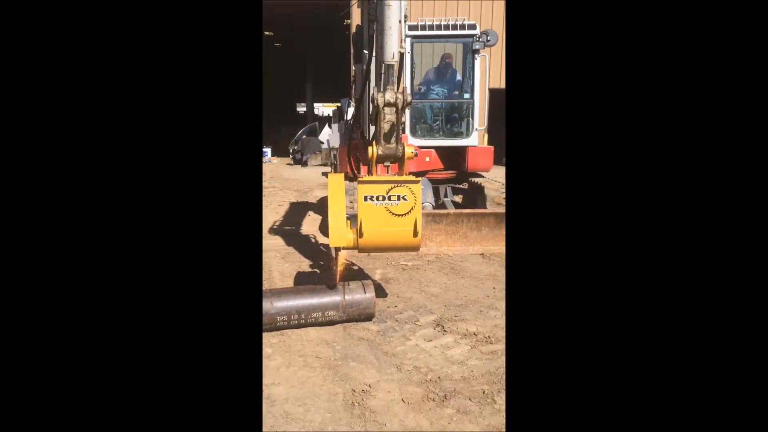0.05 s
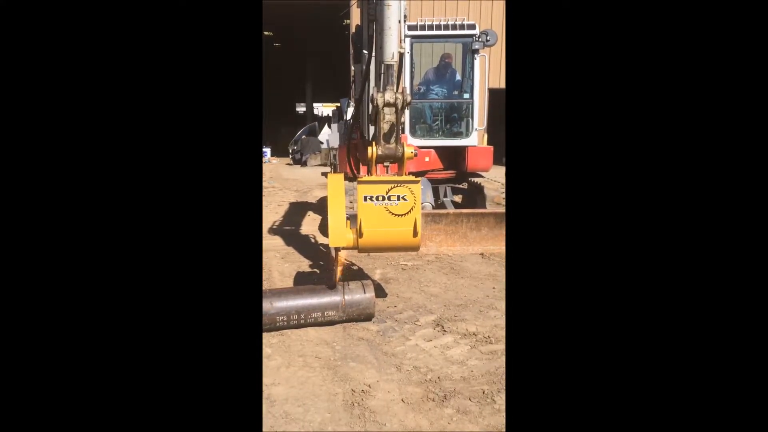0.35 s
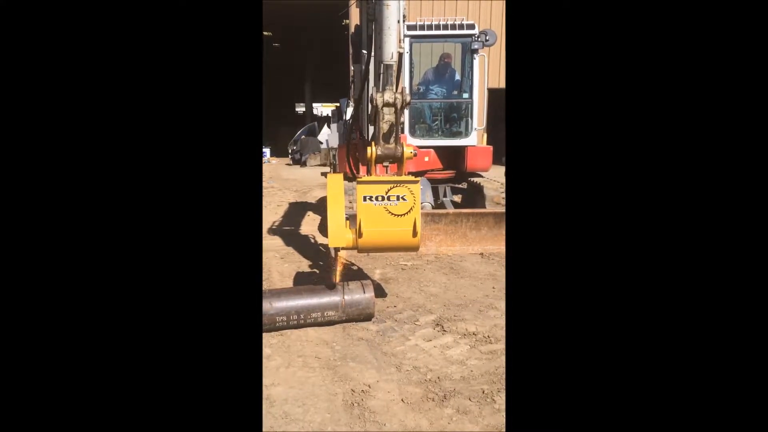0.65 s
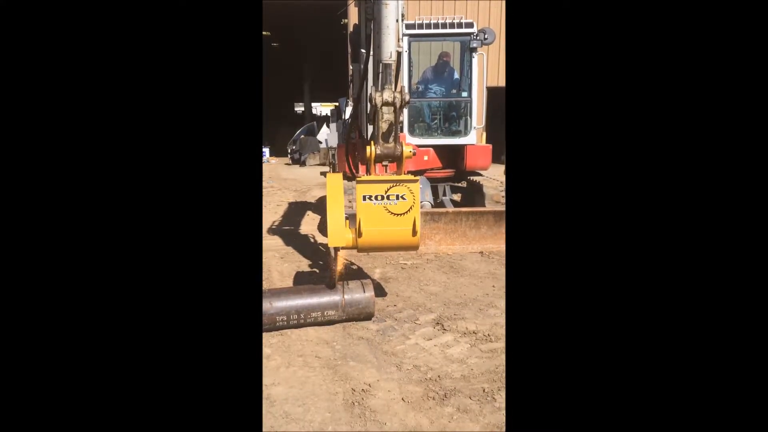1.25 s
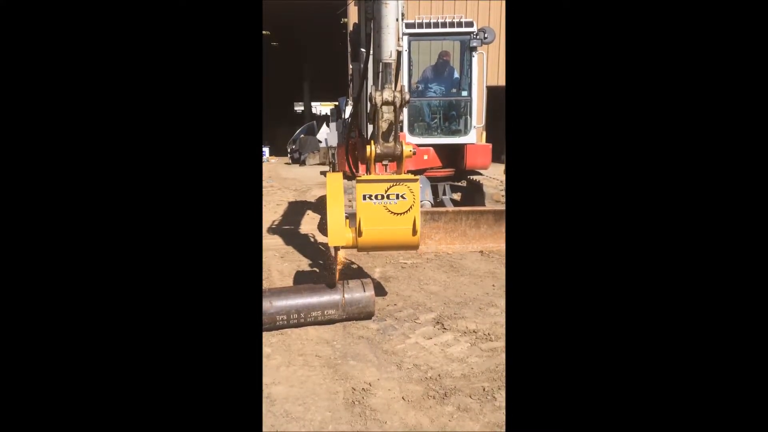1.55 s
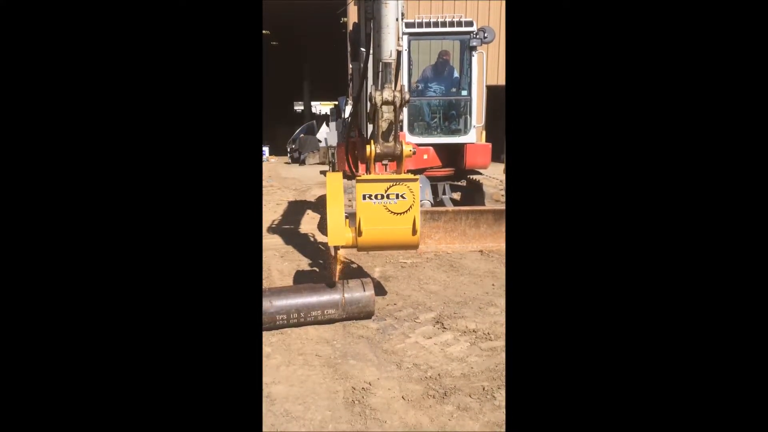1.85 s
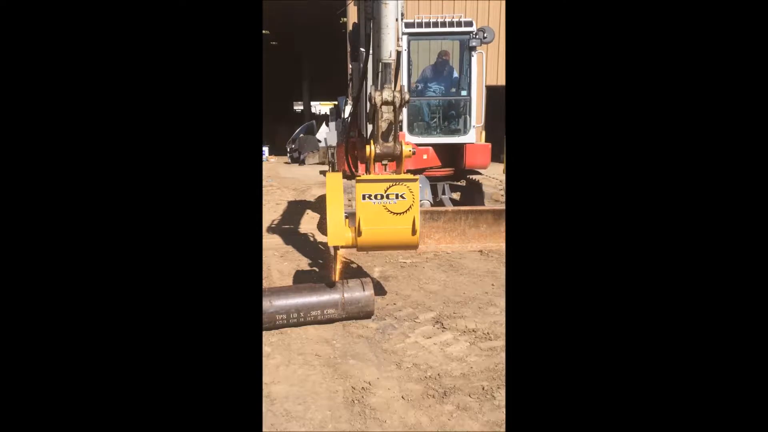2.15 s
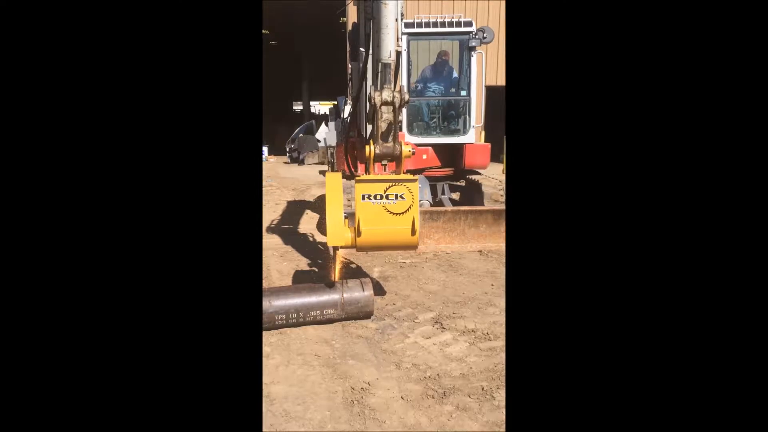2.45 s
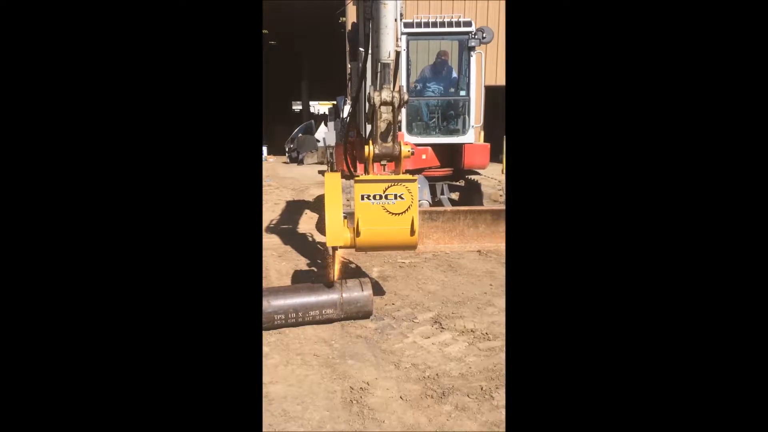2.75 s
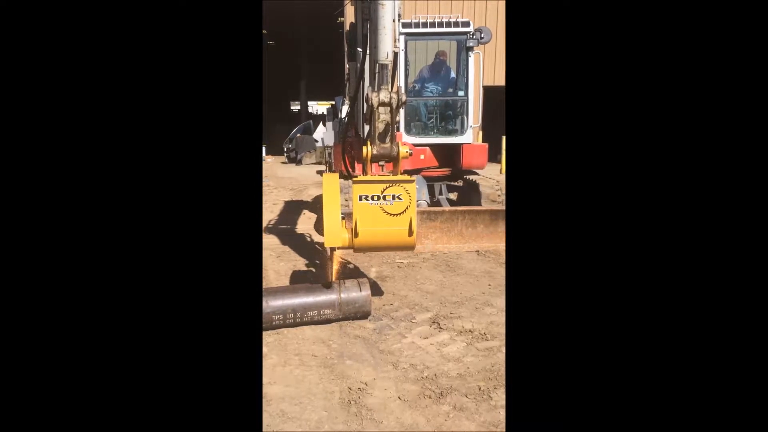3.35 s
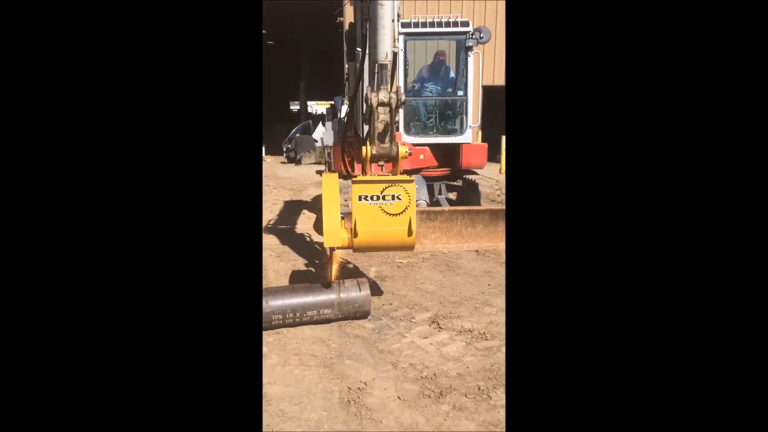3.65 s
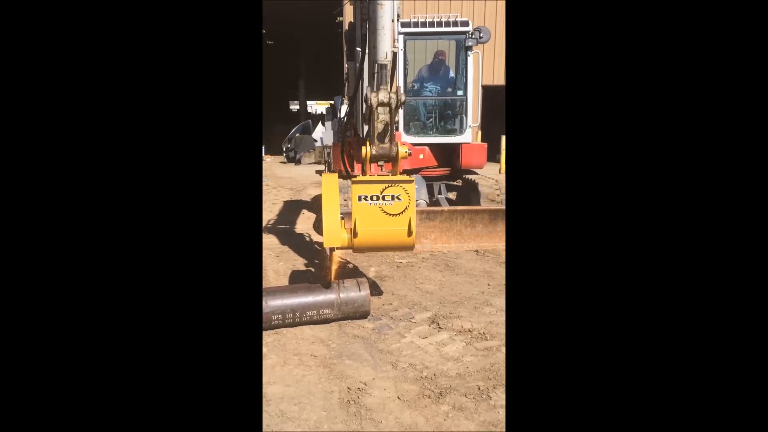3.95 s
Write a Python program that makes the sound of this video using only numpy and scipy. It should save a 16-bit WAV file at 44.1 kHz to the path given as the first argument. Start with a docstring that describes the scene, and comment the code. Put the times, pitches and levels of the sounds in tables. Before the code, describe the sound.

Saw blade cutting a steel pipe with a harsh ringing screech, diesel engine droning underneath.

```python
"""Circular saw on a steel pipe

An open yard, one microphone, close and dry, facing an excavator that holds a saw against a pipe.
The rim grinds past the cut about 37 times a second, nearly alike on every turn, and rings blade
and pipe. As it bites deeper the blade slows, the low ring fades and the screech grows.
The diesel drones steadily below."""
import sys
import numpy as np
from scipy import signal
from scipy.fft import rfft, irfft
from scipy.io import wavfile
from scipy.ndimage import uniform_filter1d, map_coordinates

SR = 44100
rng = np.random.default_rng(int(sys.argv[2]) if len(sys.argv) > 2 else 0)


def master(y):
    """Save y as 16-bit WAV."""
    cut = np.clip(np.atleast_2d(y).T, -1, 1)
    pcm = np.round(cut * 32767)  # scale
    wavfile.write(sys.argv[1], SR, pcm.astype(np.int16))


N = 176400
TIME = np.arange(N) / SR
HZ = np.maximum(np.arange(N // 2 + 1) * SR / N, 1)

# Blade speed. Each row: time in seconds, turns per second.
BLADE_SPEED = [(0.0, 36.55), (0.07, 36.66), (0.25, 37.31), (0.4, 37.57), (0.52, 37.6), (0.8, 37.3),
               (1.03, 37.39), (1.25, 37.3), (1.45, 37.36), (1.85, 37.31), (2.15, 37.03), (2.35, 36.98),
               (2.55, 36.86), (2.95, 36.68), (3.35, 36.36), (3.55, 36.13), (4.0, 35.68)]
# How far the rim has sunk into the pipe wall. Each row: time in seconds, depth from 0 to 1.
CUT_DEPTH = [(2.2, 0), (2.9, 1)]
# Sparks and chips, new on every turn. Each row: frequency in Hz, dB against the repeating grind.
SPARK_SPECTRUM = [(250, -1), (550, -0.5), (900, -4.5), (1800, -5), (3800, -5.5), (6000, -6), (8500, -6.5),
                  (13000, -3)]
# More sparks as the blade bites deeper. Each row: time in seconds, added level in dB.
SPARK_RISE = [(2.3, -2), (3.3, 0.5), (3.8, 1)]
# The steel's shimmer. Each row: frequency in Hz, shifting part in dB against the steady part.
SHIMMER_SHARE = [(600, -20), (1200, -11), (2200, -8), (4000, -7), (6000, 0), (12000, 6)]
# Broad colour of the cut. Each row: frequency in Hz, gain in dB.
CUT_COLOUR = [(240, -14.5), (310, -23.5), (380, -29), (470, -15), (700, -17), (900, -9.5), (1150, -15.5),
              (1500, -11), (1950, -8), (2150, -3.5), (2550, -9), (3200, -6.5), (3900, -6.5), (4700, -8.5),
              (6200, -10), (8000, -14.5), (10000, -20), (11000, -28.5), (13000, -28.5), (13900, -25.5),
              (15000, -38)]
# Passing resonances and notches of blade and pipe.
# Each row: fade-in and fade-out times in seconds, centre and width in Hz, lift in dB.
STEEL_RESONANCES = [(1, 2.23, 261.5, 7.7, 8), (4, 3.8, 1085, 15, 6), (2.1, 2.9, 1220, 54, -7),
                    (2.6, 3.2, 1650, 120, -2), (0, 2.4, 1790, 46, 1), (3, 3.8, 2110, 55, 4),
                    (2.3, 3.06, 4260, 70, 4), (3.2, 3.6, 2900, 87, 6), (0, 2.1, 3685, 38, -10),
                    (2.6, 3.4, 2400, 40, -5), (1, 3.4, 1920, 35, -9), (3.5, 4.6, 3940, 180, 2.5),
                    (0, 0.7, 3880, 40, 5), (1, 2.16, 4750, 90, -5), (2, 1, 5960, 60, 5),
                    (0.5, 1.8, 6950, 160, 3.5)]
# The cut's six registers at the microphone, low to high. Each row: time in seconds, level in dB.
GROWL = [(0.0, -53.5), (0.2, -55.5), (1, -54.5), (2.3, -54), (3.3, -55.5), (4, -55)]
RING = [(0.0, -47.5), (0.3, -48), (1.2, -52), (2.2, -53), (3, -53), (4.0, -51)]
RASP = [(0.0, -53), (0.26, -51), (0.53, -54), (0.7, -48), (2, -48.5), (2.6, -50), (3.04, -51.5),
        (3.55, -49.5), (4.0, -49)]
SNARL = [(0.0, -41.5), (0.29, -42.5), (0.5, -44), (1.5, -43.5), (2.3, -44), (2.94, -44), (3.4, -43),
         (3.78, -42), (4.0, -43)]
SCREECH = [(0.0, -44), (0.27, -40), (0.5, -43), (1.05, -44), (1.9, -44.5), (2.25, -40.5), (2.87, -42.5),
           (3.1, -44.5), (3.5, -41.5), (3.8, -37.5), (4.0, -38)]
HISS = [(0.0, -41), (0.23, -40.5), (1.74, -41), (2.6, -40.5), (3.2, -40.5), (4.0, -39.5)]
# The rim's high spot swells each register once a turn. Each row: level curve, low and high edge in Hz,
# place of the swell in turns for a shallow and a deep cut, its width in turns, its height in dB for
# a shallow and a deep cut, the overtones' phase scatter and dispersion in radians.
REGISTERS = [(GROWL, 242, 790, .35, 0.35, 0.34, 0.42, .5, 2, 0),
             (RING, 810, 1416, 0.42, 0.31, 0.55, 1, 1.5, 0.29, 1.4),
             (RASP, 1431, 1902, 0.27, 0.99, 0.1, 9.3, 3, 0.65, 0),
             (SNARL, 1980, 3440, 0.5, 0.51, 0.13, 2.7, 7, 0.34, 0),
             (SCREECH, 3388, 4593, 0.14, 0.2, 0.053, 5.3, 2, .6, 0),
             (HISS, 4607, 23000, 0.22, 0.24, 0.053, 4.4, 2.8, 0.95, 0)]
# Blade overtones that meet a resonance of the steel and sing for a spell. Each row: multiple of the
# blade speed (rounded in use), the spell's two ends in seconds (either order), level in dB.
BLADE_OVERTONES = [(13, 3, 4.3, -61.5), (14, -0.1, 1.1, -60.5), (15, -0.25, 0.2, -52), (15, .22, 4.3, -62),
                   (16, 0.35, 2.23, -57.5), (16, 3.5, 4.3, -59), (19, 2.5, 3.45, -57.5), (21, 1, 3.1, -59),
                   (23, 0.4, 2.2, -55), (24, -1.1, 2.96, -50.5), (25, -0.25, 0.27, -43.5),
                   (25, 0.7, 2.1, -51.5), (25, 2, 3.14, -47), (25, 3.5, 3.63, -49), (26, 0.6, 3.6, -52),
                   (27, 0.8, 2.9, -58), (28, 0.1, 2.56, -54.5), (29, 2.5, 3.44, -56.5),
                   (30, 3, 3.84, -58.5), (33, 0.8, 1.9, -54.5), (35, 3, 5.2, -55), (37, 2, 1.9, -64),
                   (38, 2, 3.46, -57), (40, -0.7, 2.75, -54), (41, -0.2, 2.6, -53.5), (42, 3, 3.86, -56),
                   (44, 2.8, 3.8, -57), (47, 0.1, 2.5, -48.5), (48, -0.26, 0.34, -46.5), (48, 0, 1.35, -54),
                   (49, -0.14, 0.33, -47), (49, 0.2, 2.1, -47.5), (49, 2.5, 3.3, -56.5),
                   (49, 3.37, 3.53, -42.5), (49, 3.6, 4.3, -52.5), (55, .2, 2.15, -52),
                   (56, 1.14, 3.5, -49), (57, -.3, 2.45, -52), (57, 2.5, 3.82, -48.5),
                   (58, 2.5, 5.2, -51.5), (59, 3, 5.2, -58), (60, 2.8, 4.8, -52), (61, 2.5, 2.2, -51),
                   (62.91, -0.3, 2.4, -54), (64, -0.5, 2.96, -52.5), (64.98, 3, 4.3, -53),
                   (66.6, 3, 4.3, -56), (71.8, 0.9, 1.65, -51.5), (76.1, -0.3, 0.76, -52),
                   (78.92, 2.5, 2.7, -50.5), (79.87, 0.5, 4.3, -50.5), (85, 4, 2.6, -50.5),
                   (85, 3.5, 4.3, -47.5), (87.2, 0.9, 2.2, -51), (90.85, 0, 1, -53),
                   (91.94, -0.2, 1.7, -51.5), (94.1, 3, 3.5, -53.5), (96.05, 2, 3.1, -52),
                   (97.1, 2, 4.7, -50.5), (101.9, 0.4, 2.1, -49.5), (103, -0.3, 2.09, -51),
                   (103.3, 2, 3.1, -44.5), (104.1, .7, 2, -51.5), (106, 3, 5, -49), (110, 3.5, 5.7, -47),
                   (113.9, 2.3, 3.6, -50.5), (115, 0.8, 3.2, -52.5), (116.2, 0.7, 1.77, -49),
                   (116.25, 2.5, 3.9, -49.5), (133.6, 7, 3.9, -51), (138.3, -1, 1.3, -56),
                   (141.4, -1.2, 3, -58), (159, 0.7, 0.94, -55), (159.3, 0.7, 2.2, -55.5),
                   (161.4, -1.5, 2.7, -55), (173.3, 3, 3.4, -61.5), (187.6, .2, 1.5, -58)]
# Exhaust tones. Each row: multiple of the firing rate, level in dB.
EXHAUST_TONES = [(1, -42.5), (2, -57.5), (3, -68)]
# Other steady hums of the machine. Each row: frequency in Hz, level in dB.
MACHINE_HUMS = [(43.7, -57), (112, -54.5), (351.9, -76)]
# Engine rumble. Each row: frequency in Hz, relative level in dB.
RUMBLE_SPECTRUM = [(20, -17), (40, -9), (65, -1), (100, 2), (150, 1), (190, -0.5), (240, -3.5), (300, -32),
                   (400, -14), (800, -20.5)]

WEAR_RAD, WEAR_RAD_PER_KHZ = 0.047, 0.044   # shift of the rim's ripples from turn to turn
SUNG_RIPPLE_DB, RIPPLE_SPREAD_DB = -11, 1.8
SHIMMER_S, SHIMMER_HZ = 0.14, 28   # life and width of a patch
RESONANCE_FADE_S, OVERTONE_FADE_S = 0.064, 0.1
OVERTONE_WAVER_DB, OVERTONE_WAVER_HZ = 1, 4.7
SLIP_RAD_PER_KHZ, SLIP_HZ = 0.096, 7.1   # the blade runs unevenly and pulls all overtones along
FLUTTER_DB, FLUTTER_HZ = 0.5, 8.9   # uneven feed: each register wavers a little
DIP_AT_S, DIP_WIDTH_S, DIP_DB = 3.714, 0.007, -20
FIRING_HZ, RUMBLE_DB = 77.63, -48
ENGINE_WAVER_DB, ENGINE_WAVER_RAD = 1, 0.07
CUTOFF_HZ = 15300


def from_db(db):
    """Decibels to gain."""
    return 10 ** (np.asarray(db) / 20)


def rms_one(x):
    """Scale to unit rms."""
    return x / np.sqrt(np.mean(x ** 2) + 1e-20)


def in_time(rows):
    """A curve's value at every sample."""
    return np.interp(TIME, *np.transpose(rows))


def over_hz(points):
    """A spectrum's value at every frequency."""
    hz, db = np.transpose(points)
    return np.interp(np.log(HZ), np.log(hz), db)


def coloured(x, gain):
    """Filter by a gain per frequency."""
    return irfft(rfft(x) * gain, N)


def band(x, low_hz, high_hz, steepness):
    """Keep what lies between two frequencies."""
    return coloured(x, 1 / ((1 + (low_hz / HZ) ** steepness) * (1 + (HZ / high_hz) ** steepness)))


def evened(x, size=4760):
    """Hold the level at 1 over a few turns."""
    return x / np.sqrt(uniform_filter1d(uniform_filter1d(x * x, size), size) + 1e-20)


def drift(rate_hz):
    """A slow random wander with spread 1."""
    return rms_one(coloured(rng.standard_normal(N), 1 / (1 + (HZ / rate_hz) ** 2)))


def coarse_drift(rate_hz, size=800):
    """The same kind of wander, drawn on a coarse grid."""
    hz = np.arange(size // 2 + 1) * SR / N
    slow = rms_one(irfft(rfft(rng.standard_normal(size)) / (1 + (hz / rate_hz) ** 2)))
    return np.interp(TIME, np.linspace(0, N / SR, size), slow)


def rim(turns, size=2048, count=440):
    """The rim's ripples pass the cut; the fine ones wear fastest, and those that sing grind less."""
    laps = int(turns[-1]) + 3
    khz = np.arange(count) * np.mean(in_time(BLADE_SPEED)) / 1000
    phase = rng.uniform(0, 2 * np.pi, count)
    wear = np.cumsum(rng.standard_normal((laps, count)), axis=0) * (WEAR_RAD + WEAR_RAD_PER_KHZ * khz)
    sung = np.isin(np.arange(count), [round(row[0]) for row in BLADE_OVERTONES])
    height = from_db(SUNG_RIPPLE_DB * sung + RIPPLE_SPREAD_DB * rng.standard_normal(count))
    profile = irfft(height * np.exp(1j * (phase + wear)), size)   # one row per turn
    return rms_one(map_coordinates(profile, [turns, turns % 1 * size], order=1, mode="grid-wrap"))


def friction(turns):
    """The rim's repeating grind plus the fresh noise of sparks and chips."""
    share = from_db(over_hz(SPARK_SPECTRUM))
    grind = coloured(rim(turns), 1 / np.hypot(1, share))
    sparks = coloured(rng.standard_normal(N), share / np.hypot(1, share))
    return grind + from_db(in_time(SPARK_RISE)) * sparks


def shimmer(x, size=2048):
    """The steel's dense modes add and cancel as the contact moves: narrow patches swell and fade."""
    hz, seconds, frames = signal.stft(x, SR, nperseg=size)
    field = np.fft.fft2(rng.standard_normal(frames.shape) + 1j * rng.standard_normal(frames.shape))
    blur_hz = np.exp(-2 * (np.pi * np.fft.fftfreq(len(hz), hz[1]) * SHIMMER_HZ) ** 2)
    blur_time = np.exp(-2 * (np.pi * np.fft.fftfreq(len(seconds), seconds[1]) * SHIMMER_S) ** 2)
    patches = np.fft.ifft2(field * np.outer(blur_hz, blur_time))
    share = from_db(np.interp(hz, HZ, over_hz(SHIMMER_SHARE)))[:, None]
    gain = np.abs(1 + share * patches / np.std(patches)) / np.hypot(1, share)
    return signal.istft(frames * gain, SR, nperseg=size)[1][:N]


def steel(drive):
    """Blade and pipe colour the friction; resonances and notches come and go as the contact moves."""
    out = coloured(shimmer(drive), from_db(over_hz(CUT_COLOUR)))
    spectrum = rfft(out)
    for start, end, hz, width, lift_db in STEEL_RESONANCES:
        fade_in = .5 + .5 * np.tanh((TIME - start) / RESONANCE_FADE_S) if start > 0 else 1
        fade_out = .5 + .5 * np.tanh((end - TIME) / RESONANCE_FADE_S)
        ringing = irfft(spectrum * np.exp(-.5 * ((HZ - hz) / width) ** 2), N)
        out = out + (from_db(lift_db) - 1) * fade_in * fade_out * ringing
    return out


def singing(turns):
    """Clean metallic overtones locked to the blade; neighbours beat together as the high spot passes."""
    out = 0
    speed = np.mean(in_time(BLADE_SPEED))
    slip = SLIP_RAD_PER_KHZ * coarse_drift(SLIP_HZ)
    for k in sorted({round(row[0]) for row in BLADE_OVERTONES}):
        hz = k * speed
        register = [row for row in REGISTERS if row[1] <= hz][-1]
        _, _, _, place, *_, scatter, dispersion = register
        spells = 0
        for multiple, start, end, db in BLADE_OVERTONES:
            if round(multiple) == k:
                gate = np.tanh((TIME - start) / OVERTONE_FADE_S) - np.tanh((TIME - end) / OVERTONE_FADE_S)
                spells += from_db(db) * gate / 2
        # dispersion turns the throb into a warble
        phase = dispersion * k ** 2 + scatter * rng.standard_normal() + slip * hz / 1000
        waver = from_db(OVERTONE_WAVER_DB * coarse_drift(OVERTONE_WAVER_HZ))
        out += np.sqrt(2) * spells * waver * np.sin(2 * np.pi * k * (turns - place) + phase)
    return out


def high_spot(turns, place, width):
    """A bell-shaped pulse each time the rim's high spot meets the cut."""
    offset = (turns - place + .5) % 1 - .5
    return np.exp(-.5 * (offset / width) ** 2)


def saw():
    """The steel grinds and sings; each register of the grind swells once a turn."""
    turns = np.cumsum(in_time(BLADE_SPEED)) / SR
    cut = steel(friction(turns))
    depth = in_time(CUT_DEPTH)
    out = singing(turns)
    for level, low_hz, high_hz, shallow_at, deep_at, width, shallow_db, deep_db, *_ in REGISTERS:
        swell_db = shallow_db * (1 - depth) * high_spot(turns, shallow_at, width)
        swell_db += deep_db * depth * high_spot(turns, deep_at, width)
        throb = evened(from_db(swell_db) * band(cut, low_hz, high_hz, steepness=60))
        out += from_db(in_time(level) + FLUTTER_DB * drift(FLUTTER_HZ)) * throb
    # bass and treble dip briefly near the end
    dip = from_db(DIP_DB * np.exp(-.5 * ((TIME - DIP_AT_S) / DIP_WIDTH_S) ** 2))
    middle = band(out, low_hz=800, high_hz=4800, steepness=12)
    return middle + dip * (out - middle)


def engine_tone(cycles, db):
    """A sine that wavers slightly in level and phase."""
    amplitude = np.sqrt(2) * from_db(db + ENGINE_WAVER_DB * drift(rate_hz=8.3))
    return amplitude * np.sin(2 * np.pi * (cycles + rng.random()) + ENGINE_WAVER_RAD * drift(rate_hz=6.1))


def diesel():
    """The exhaust drones at the firing rate and its multiples, over machine hums and rumble."""
    firings = FIRING_HZ * TIME
    exhaust = sum(engine_tone(k * firings, db) for k, db in EXHAUST_TONES)
    hums = sum(engine_tone(hz * TIME, db) for hz, db in MACHINE_HUMS)
    rumble = rms_one(coloured(rng.standard_normal(N), from_db(over_hz(RUMBLE_SPECTRUM))))
    return exhaust + hums + from_db(RUMBLE_DB) * rumble


def scene():
    """Saw and engine straight ahead of the microphone, alike in both channels."""
    return np.tile(saw() + diesel(), (2, 1))


def record(dry):
    """The microphone's signal, with the highest treble cut steeply."""
    return coloured(dry, 1 / np.sqrt(1 + (HZ / CUTOFF_HZ) ** 400))


dry = scene()
out = record(dry)
master(out)
```